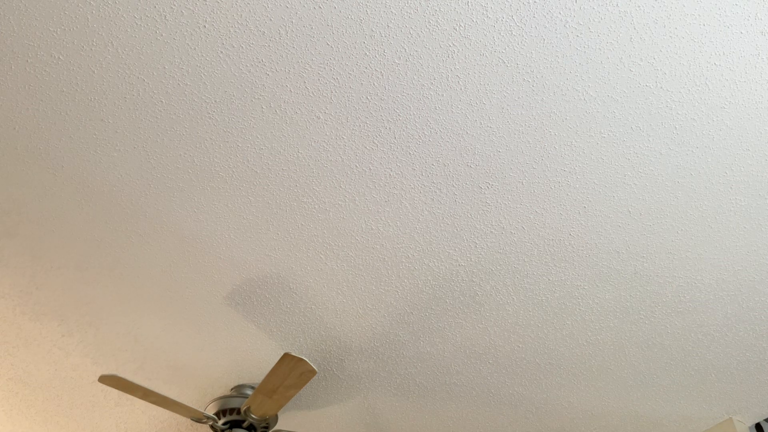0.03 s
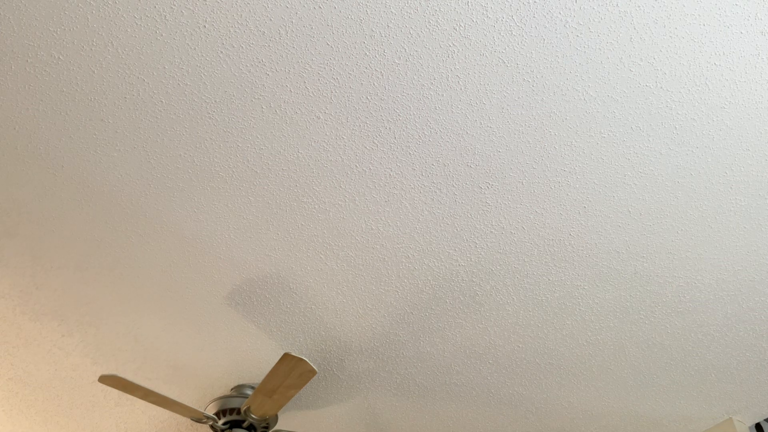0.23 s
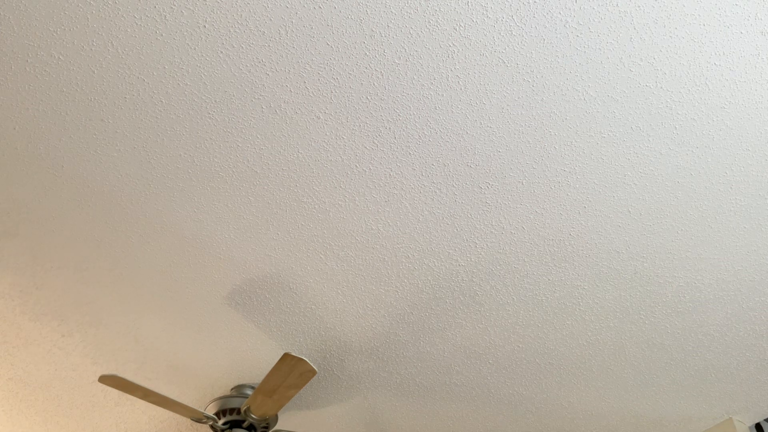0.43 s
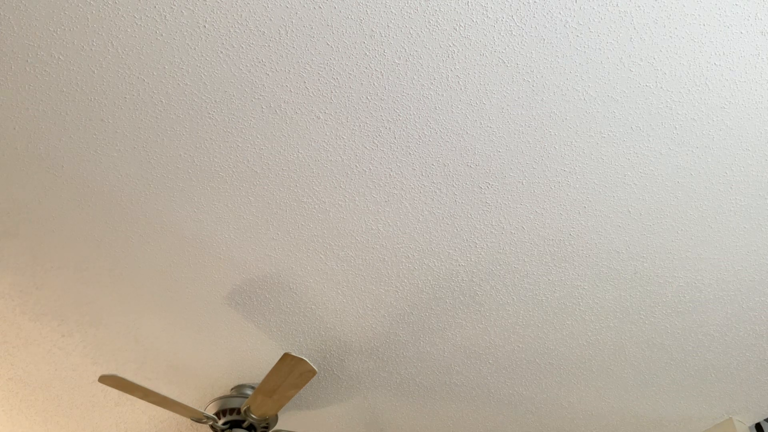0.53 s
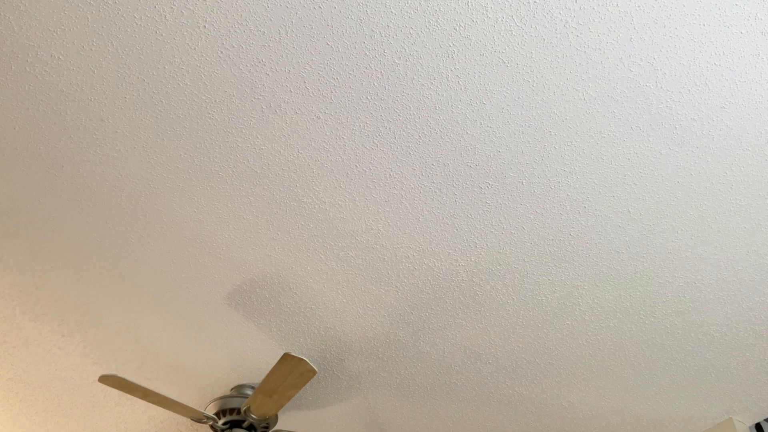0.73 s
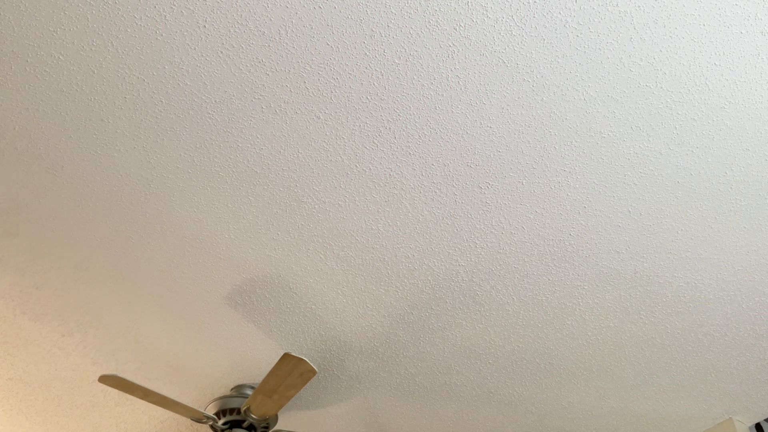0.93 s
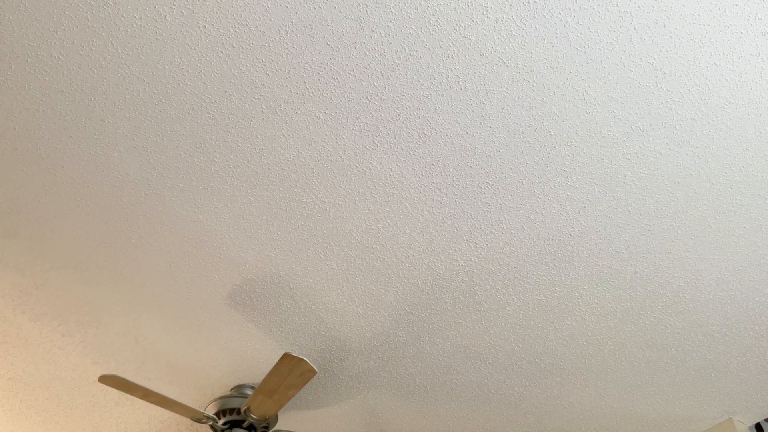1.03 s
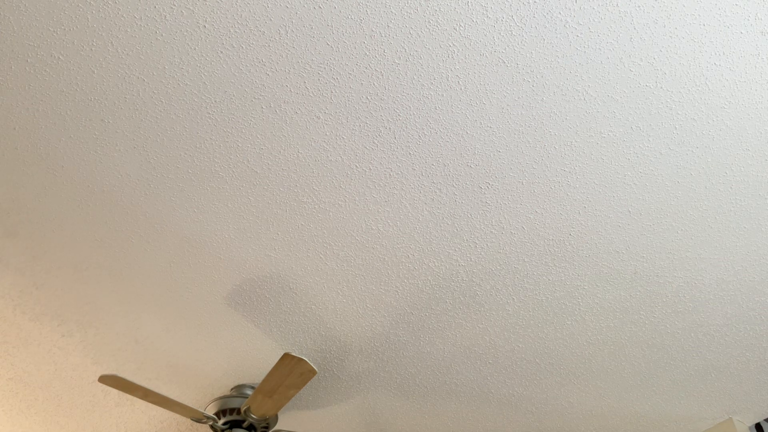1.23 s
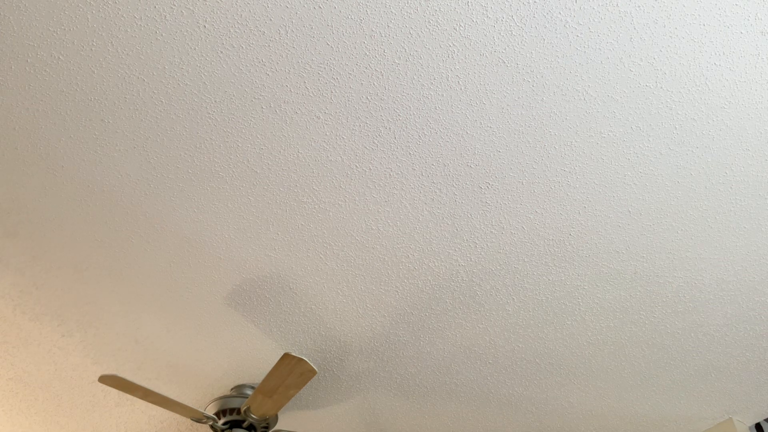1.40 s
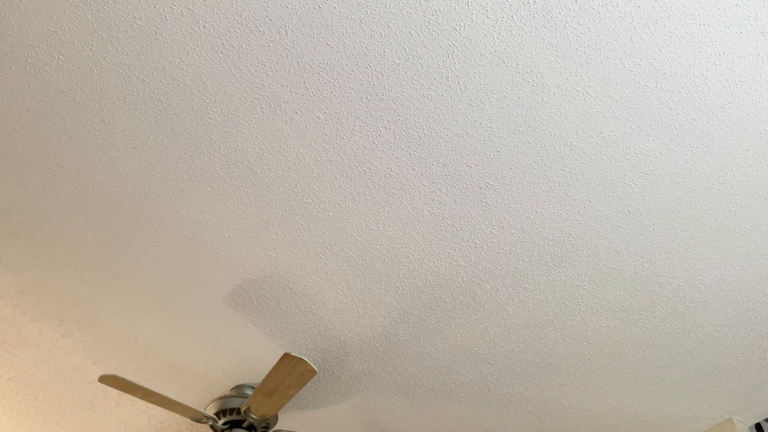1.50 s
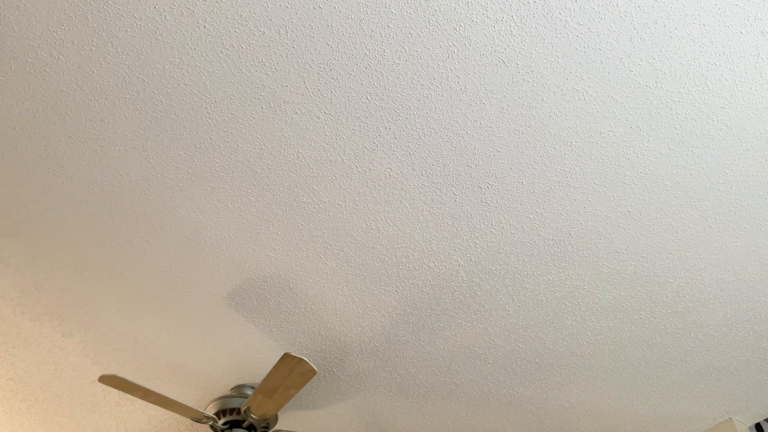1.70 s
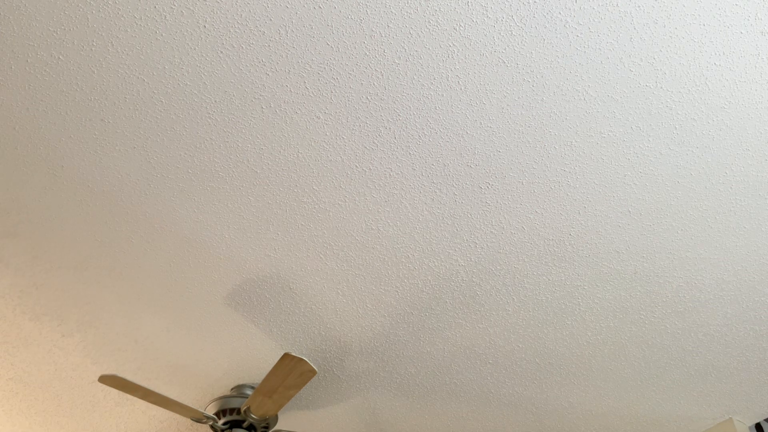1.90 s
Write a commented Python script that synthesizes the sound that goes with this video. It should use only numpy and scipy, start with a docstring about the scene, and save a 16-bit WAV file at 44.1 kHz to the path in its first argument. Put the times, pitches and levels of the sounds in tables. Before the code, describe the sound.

Heavy footsteps thump upstairs, heard through the ceiling of a quiet room. Three slow steps, the first loudest and the second light, each give a low boom and soft scuff over a faint hum.

```python
"""A quiet room, with three slow, heavy footfalls on the storey above.
Each sets the floor and the room booming in beating low modes, with a short woody thud and a soft scuff.
After the heavier steps a loose board rings on and a thin, high friction squeak lingers.
The house hums faintly underneath."""
import sys
import numpy as np
from scipy import signal
from scipy.fft import rfft, irfft, next_fast_len
from scipy.io import wavfile
from scipy.ndimage import map_coordinates

SR = 44100
rng = np.random.default_rng(int(sys.argv[2]) if len(sys.argv) > 2 else 0)


def wrap_up_sound(samples):
    """Save the sound to the file named by the first command line argument, as 16-bit audio."""
    columns = np.atleast_2d(samples).T
    # keep every value between -1 and 1, then stretch to whole-number steps
    tamed = np.clip(columns, -1, 1)
    steps = np.round(tamed * 32767).astype(np.int16)
    wavfile.write(sys.argv[1], SR, steps)


N = 85995

# footfalls and light shifts of weight
# (time [s], boom level [dB], heel hardness [dB/octave], thud level [dB], thud pitch [ratio])
STEPS = [(-.075, -24.5, 4, -60, .8), (.205, -3, -2, -47, 0.93), (0.8161, -22.5, 10, -49, 0.99),
         (1.5601, -9.5, -0.2, -48.5, 0.89)]


def boom():
    """Every footfall rings the same low modes; a hard heel favours the upper ones."""
    # modes of the ceiling and room (frequency [Hz], level [dB], T60 [s])
    modes = [(40, -43.5, 1.1), (45.3, -31.5, 0.72), (51.2, -28, 0.33), (60.83, -20.5, 0.79),
             (69.2, -29.5, 0.15), (75.44, -32, 1.49), (81.23, -26, 0.68), (94.4, -35, 0.53),
             (106.9, -41, 1.4), (143, -45.42, 0.86), (169.7, -34.5, 0.51), (186, -47.5, 0.3),
             (196.3, -42, 0.44)]
    pivot_hz = 56.5  # hardness tilts the modes about this frequency
    out = np.zeros(N)
    for start, boom_db, hardness, _, _ in STEPS:
        for k, (hz, db, t60) in enumerate(modes):
            tilt_db = hardness * np.log2(hz / pivot_hz)
            gain = (-1) ** k * amp(boom_db + db + tilt_db)  # neighbours in opposite polarity
            tone = np.sin(2 * np.pi * hz * since(start))
            out += gain * tone * envelope(start, attack=0.0056, t60=t60)
    return out


def thud():
    """The boards answer the sole's light touch and, just after it, the full weight."""
    # dense upper modes of the boards (frequency [Hz], relative level [dB])
    boards = [(50, -42), (110, -7.5), (175, 1.5), (220, -1), (290, -2), (370, -1), (510, -4.5),
              (660, -14.5), (900, -23), (1500, -57), (4000, -74)]
    out = np.zeros(N)
    for start, _, _, db, pitch in STEPS:
        touch = amp(-6) * envelope(start - 0.021, attack=0.0099, t60=1)
        weight = envelope(start, attack=0.0099, hold=0.015, t60=0.5)
        out += amp(db) * np.hypot(touch, weight) * noise(boards, pitch)
    return out


def scuffs():
    """Short brushes in four bands of rustle, smeared by the room's reverberation."""
    # scuffs (time [s], rise [s], pitch [ratio], low [dB], mid [dB], high [dB], top [dB])
    brushes = [(-.19, 0.03, 1.01, -64.5, -71, -67.5, -77), (0.193, 0.03, 0.99, -57.5, -69.5, -65, -88),
               (0.415, 0.029, 0.998, -59.5, -59.5, -67, -67.5), (.797, 0.032, 0.94, -67.5, -76, -70.5, -82),
               (1.547, 0.037, 1.063, -67, -66, -72, -89)]
    # colour of each rustle band (frequency [Hz], relative level [dB])
    low = [(200, -7.5), (500, 0), (800, -3.5), (1100, -3), (1650, -1.5), (2100, -16.5), (3500, -61),
           (8000, -71)]
    mid = [(500, -43), (1200, -25), (1900, 1), (2500, 2), (2700, -0.5), (2900, -10), (4500, -19),
           (9000, -73)]
    high = [(1800, -10.5), (3000, 0), (4200, 2), (5600, -1.5), (6500, -20), (9000, -38), (12000, -72)]
    top = [(4500, -17), (5600, 10), (7500, 0), (9000, -4), (10000, -13), (12000, -46), (16000, -70)]
    # T60 of each band's tail (low [s], mid [s], high [s], top [s])
    decays = (1, 0.99, 1, 0.93)
    out = np.zeros(N)
    for start, rise, pitch, *levels_db in brushes:
        for db, band, t60 in zip(levels_db, (low, mid, high, top), decays):
            out += amp(db) * envelope(start, attack=rise, hold=0.031, t60=t60) * noise(band, pitch)
    return out


def loose_board():
    """A loose board rings on between the steps: one soft, slowly fading note."""
    # rings of the board (time [s], level [dB])
    rings = [(.4, -60), (1.7, -64)]
    note_hz = 228
    out = np.zeros(N)
    for start, db in rings:
        tone = np.sin(2 * np.pi * note_hz * since(start))
        out += amp(db) * envelope(start, attack=0.016, t60=2.3) * tone
    return out


def squeaks():
    """An unsteady, very high friction tone that lingers in the room."""
    # squeaks (time [s], length [s], start pitch [Hz], end pitch [Hz], relative level [dB])
    glides = [(0.265, 0.07, 9400, 9340, -83), (.385, 0.021, 9330, 9600, -79.5),
              (1.568, 0.058, 9140, 9230, -68), (1.628, 0.034, 9600, 9500, -71)]
    jitter_hz = 186
    out = np.zeros(N)
    for start, length, start_hz, end_hz, db in glides:
        progress = np.minimum(since(start) / length, 1)
        hz = start_hz + (end_hz - start_hz) * progress + jitter_hz * wobble(rate=600)
        swell = np.sqrt(np.abs(np.sin(np.pi * progress)))
        tone = swell * np.sin(2 * np.pi * np.cumsum(hz) / SR)
        room = rng.standard_normal(N) * envelope(0, attack=0.0014, t60=0.4)
        out += 2 * amp(db) * signal.fftconvolve(tone, room / np.linalg.norm(room))[:N]
    return out


def house():
    """Room tone: a wavering hum in a faint bed of air."""
    # partials of the hum (frequency [Hz], rms level [dB])
    partials = [(80.7, -68.5), (113, -75), (231.5, -81.5), (344.5, -80)]
    # colour of the air (frequency [Hz], relative level [dB])
    air = [(20, -19), (40, -5), (75, -2.5), (200, -12), (340, -17), (720, -25), (1400, -25.5),
           (5500, -28.5), (8000, -32), (11000, -37), (15500, -35)]
    hum = np.zeros(N)
    for hz, db in partials:
        level = amp(db + wobble(rate=5.37))  # wavers by about 1 dB
        hum += level * np.sin(2 * np.pi * (hz * since(0) + rng.random()))
    return np.sqrt(2) * hum + amp(-66) * noise(air)


def amp(db):
    """Decibels to gain."""
    return 10 ** (np.asarray(db) / 20)


def since(start):
    """Seconds after start, zero before it."""
    return np.maximum(np.arange(N) / SR - start, 0)


def envelope(start, attack, t60, hold=0):
    """Straight rise, hold, exponential release; all times in seconds."""
    return np.minimum(since(start) / attack, 1) * amp(-60 * since(start + attack + hold) / t60)


def filtered(x, response):
    """Equalise x with a gain curve over frequency in Hz."""
    size = next_fast_len(N + SR // 2)
    return irfft(rfft(x, size) * response(np.fft.rfftfreq(size, 1 / SR)), size)[:N]


def noise(spectrum, pitch=1):
    """Noise of rms 1 coloured by (frequency [Hz], level [dB]) points, transposed by a pitch ratio."""
    points_hz, db = np.transpose(spectrum)
    white = rng.standard_normal(N)
    coloured = filtered(white, lambda hz: amp(np.interp(np.log(hz + 1), np.log(points_hz * pitch), db)))
    return coloured / np.sqrt(np.mean(coloured ** 2) + 1e-20)


def wobble(rate):
    """A smooth random curve, rate knots a second."""
    return map_coordinates(rng.standard_normal(N // 8), [np.arange(N) * rate / SR], mode="wrap")


def scene():
    """The mono mix, as heard below the ceiling."""
    return (boom() + thud() + scuffs() + loose_board() + squeaks() + house())[None]


def record(dry):
    """The microphone loses the deepest bass and keeps nothing above its band limit."""
    low_hz, top_hz = 22, 15900
    low_cut = signal.butter(2, low_hz, "highpass", fs=SR, output="sos")
    return filtered(signal.sosfilt(low_cut, dry[0]), lambda hz: hz < top_hz)[None]


dry = scene()
out = record(dry)
wrap_up_sound(out)
```